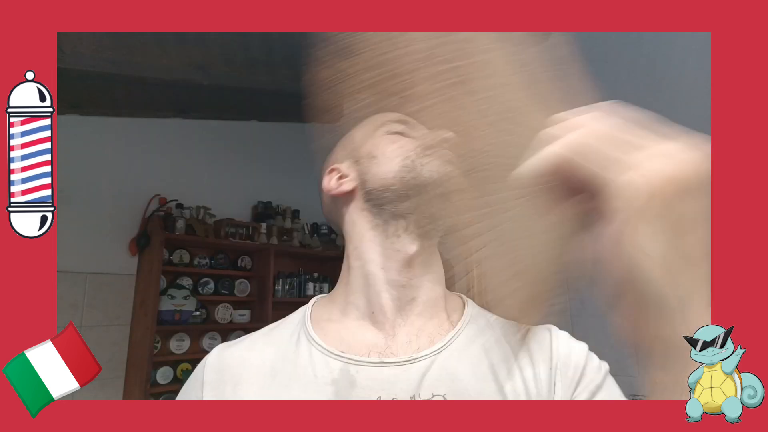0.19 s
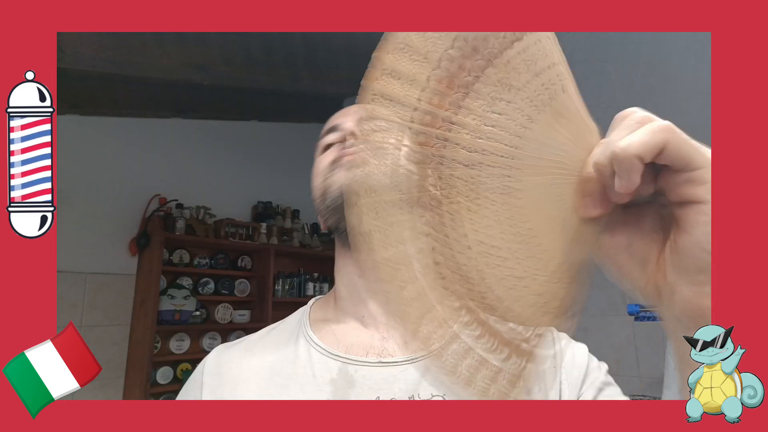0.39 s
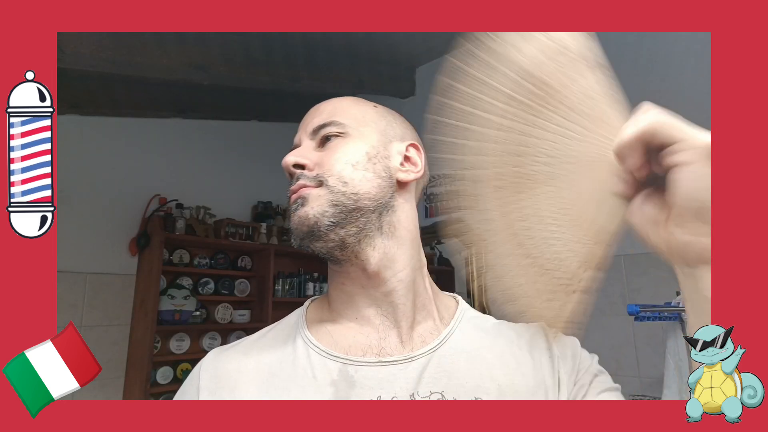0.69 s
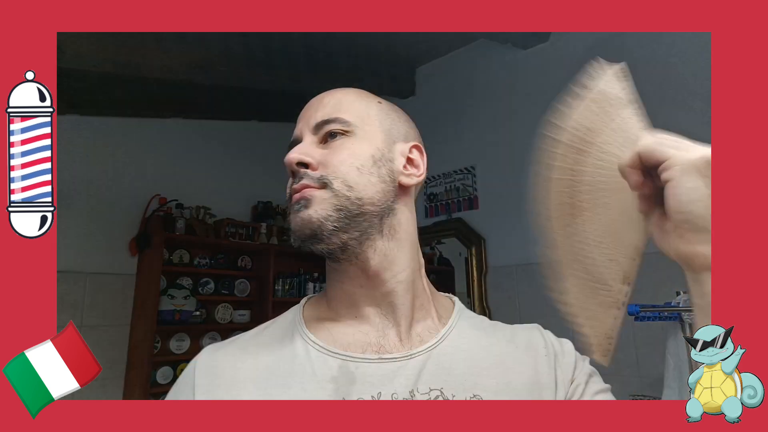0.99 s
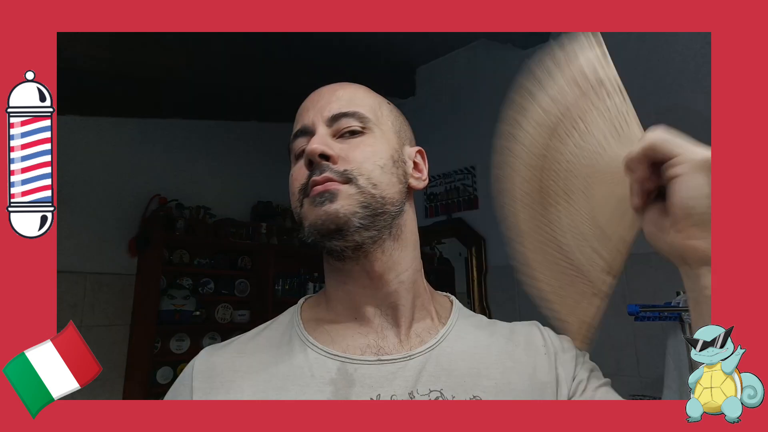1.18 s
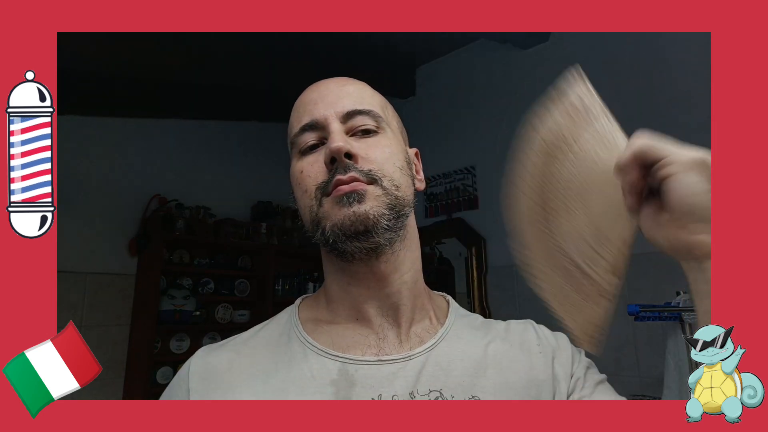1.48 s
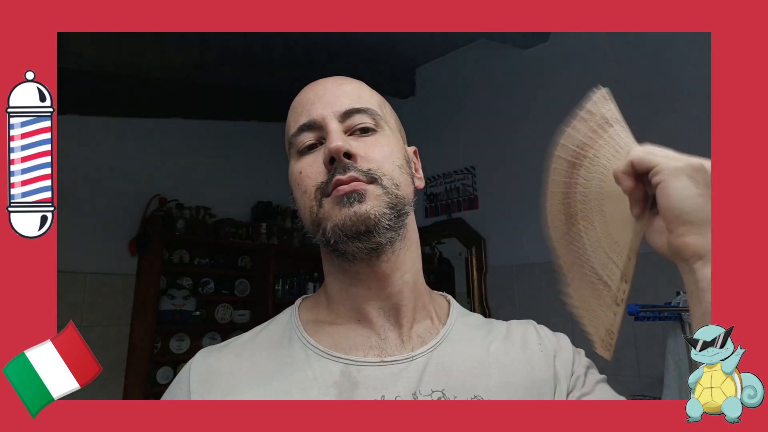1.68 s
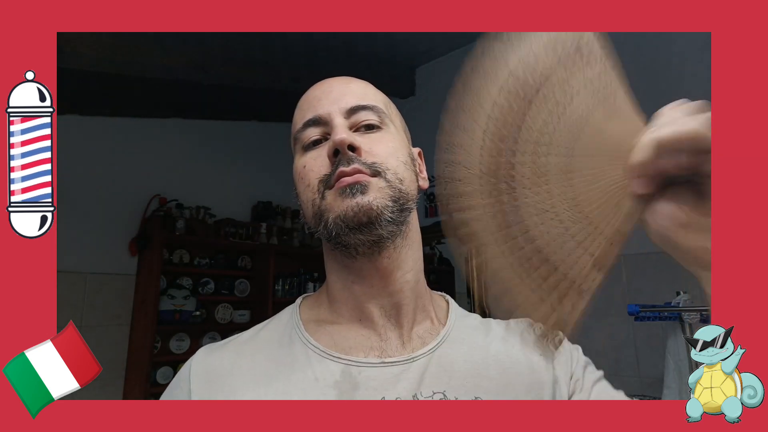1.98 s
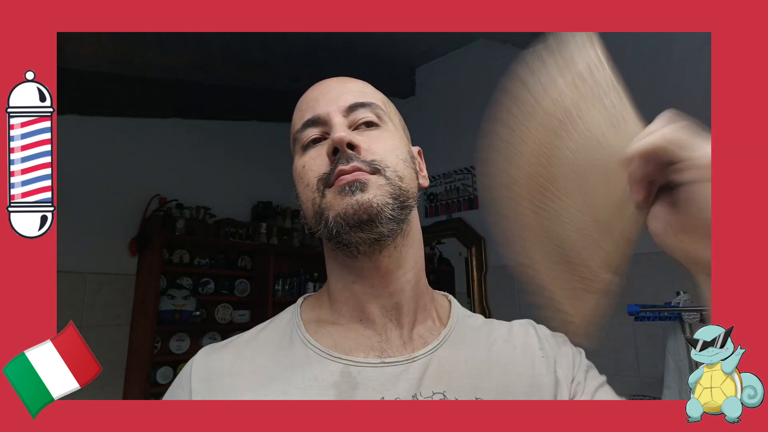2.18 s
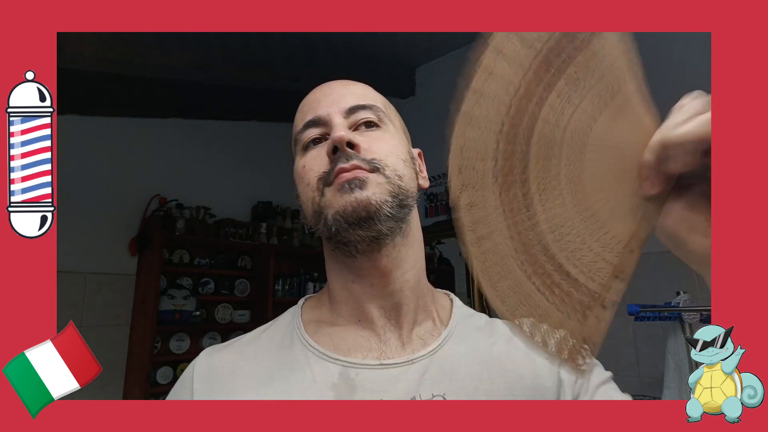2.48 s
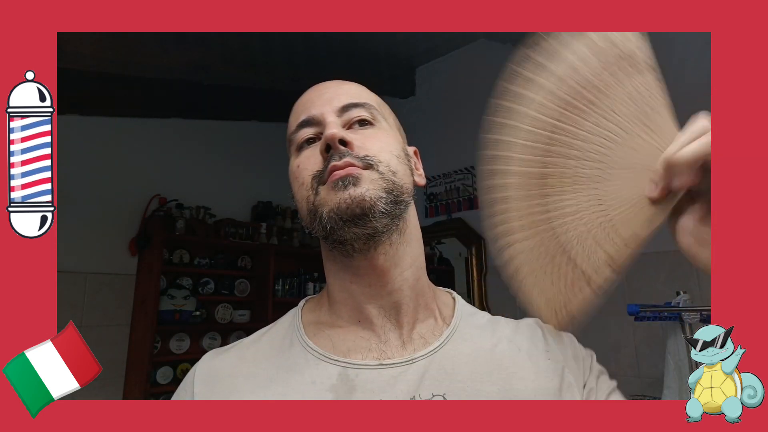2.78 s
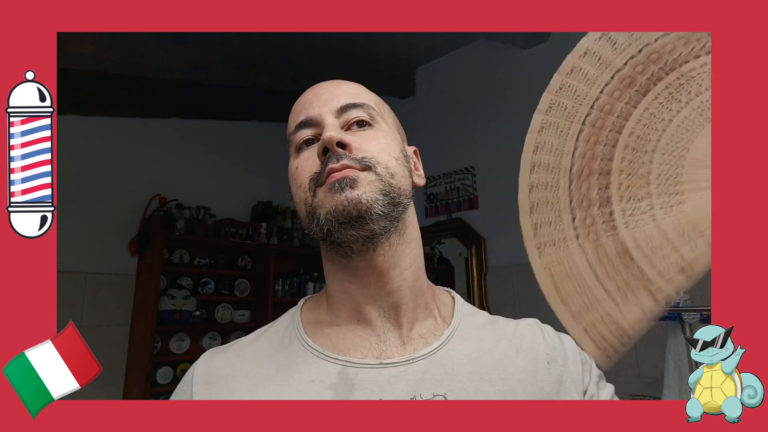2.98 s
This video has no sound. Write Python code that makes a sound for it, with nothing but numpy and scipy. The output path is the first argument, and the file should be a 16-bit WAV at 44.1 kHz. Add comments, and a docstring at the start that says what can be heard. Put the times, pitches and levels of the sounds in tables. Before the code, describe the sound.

Close stereo sound of a wooden hand fan beating quickly indoors; each stroke snaps the slats together with a short rattle and gentle puff of air, the return knocks softer, ending in faint rustle and quiet room tone.

```python
"""A slatted wooden hand fan is waved fast in a small room, heard close up in stereo.
It opens in the tail of a clap; then each forward stroke ends with the slats clapping together three times
and rattling out, and the air pushed by the leaf swells in a low whoosh. On each way back the slats slide
and knock more softly. After the last stroke a few loose slats tick and the leaf rustles to rest.
Wood is a train of random contacts through slat rings; air is noise in low resonances; quiet room tone lasts."""
import sys
import numpy as np
from scipy import signal
from scipy.fft import rfft, irfft
from scipy.io import wavfile
from scipy.ndimage import uniform_filter1d

SR = 44100
rng = np.random.default_rng(int(sys.argv[2]) if len(sys.argv) > 2 else 0)


def dump(signal):
    """Clip the signal to [-1, 1] and save it as 16-bit WAV at the path in sys.argv[1]."""
    limited = np.clip(np.atleast_2d(signal).T, -1, 1)
    pcm = np.round(limited * 32767).astype(np.int16)
    wavfile.write(sys.argv[1], SR, pcm)


N = 136710  # length [samples]
PARTS, SLATS = 6, 24  # parts of the leaf, and slats shared out among them

# Forward strokes of the fan: (time [s], first clap level [dB], second clap over the first [dB],
# delay of the second [s], rattle over the first clap [dB], whoosh level [dB], drive of the outer sticks' ring [dB],
# delay of the third clap [s], third clap over the first [dB], pitch of the loudest slat [Hz])
STROKES = [(-.02, -18, -2, 0.0046, -14, -70.5, 17, 0.017, -7, 3070),
           (0.2154, -22, 5, 0.0047, -5.5, -61.5, 9.5, 0.012, -4, 5450),
           (0.473, -22, 4, 0.004, -6.5, -55, 16.5, 0.0061, -4, 4800),
           (0.7072, -19.5, 6.5, 0.0046, -12.5, -60, 14.5, 0.012, 1.5, 3950),
           (0.9306, -17, 3, 0.0051, -11.5, -52.5, 14.5, 0.011, -9, 4740),
           (1.1606, -16.5, 3.5, 0.0043, -10, -52, 11.5, 0.008, -16, 4770),
           (1.39, -23.5, 11, 0.0045, -5.5, -52, 7.5, 0.032, -9, 4050),
           (1.6135, -21.5, 7.5, 0.0047, -8, -51, 6.5, 0.01, -1.5, 3710),
           (1.84, -22, -3, 0.0038, -5, -57, 7.5, 0.017, -4, 4900),
           (2.0628, -23, 7, 0.0042, -6, -57.5, 9, 0.018, -5, 4800),
           (2.2874, -21, 6.5, 0.0045, -7, -53.5, 9.5, 0.0088, 0, 4950),
           (2.5135, -23, 5.5, 0.0051, -5, -52, 9.5, 0.014, -2, 4860),
           (2.749, -20.5, -2.5, 0.0033, -12.5, -56.5, 12, 0.011, -2, 4800)]


def amp(db):
    """Decibels to amplitude."""
    return 10 ** (np.asarray(db) / 20)


def evened(x):
    """Scale to an RMS of one."""
    return x / np.sqrt(np.mean(x ** 2) + 1e-20)


def read(points, hz):
    """Read a curve of (frequency, value) points along a log frequency axis."""
    f, value = np.transpose(points)
    return np.interp(np.log(hz + 1), np.log(f + 1), value)


def dying(s, decay_s, rise_s):
    """Envelope: exponential rise up to time s, exponential fall after, both as time constants."""
    t = np.arange(N) / SR - s
    return np.exp(np.where(t < 0, t / rise_s, -t / decay_s))


def resonate(x, hz, width):
    """Two-pole resonance with its bandwidth in Hz."""
    return signal.lfilter(*signal.iirpeak(hz, hz / width, SR), x)


def contacts():
    """Tiny wood contacts at random moments, of random strength and sign."""
    per_s, spread_db = 12000, 2.5
    strength = amp(spread_db * np.minimum(rng.exponential(1, N), 4))
    struck = rng.random(N) < per_s / SR
    return evened(strength * struck * rng.choice([-1., 1.], N))


def claps(size):
    """Slats meet three times and rattle out; the outer sticks and one loud slat ring along."""
    hold_s, soft_rise_s = 0.0018, 0.00022
    first_s, later_s, rattle_s = 0.0011, 0.0021, 0.025  # decay time constants
    creak_db, creak_rise_s = -28.5, 0.0069  # faint creak that leads into a clap
    stick_hz, stick_width = 1385, 110
    loudest_db, loudest_width = 19, 207  # drive of the loudest slat's ring, width [Hz]
    force, loose, ring = np.zeros((3, N))
    for s, db, second_db, delay, rattle_db, _, stick_db, third, third_db, loudest_hz in STROKES:
        # the first clap rises quickly, holds for a moment, then dies
        clap = amp(db) * np.minimum(dying(s + hold_s, first_s, 1), dying(s, 1, soft_rise_s))
        clap += amp(db + second_db) * dying(s + delay, later_s, 0.00021)
        clap += amp(db + third_db) * dying(s + third, later_s, soft_rise_s)
        rattle = amp(db + rattle_db) * dying(s + delay, rattle_s, 0.0022)
        force += clap
        loose += rattle + amp(db + creak_db) * dying(s, 0.002, creak_rise_s)
        ring += amp(stick_db) * resonate(size * (clap + rattle), stick_hz, stick_width)
        ring += amp(loudest_db) * resonate(size * clap, loudest_hz, loudest_width)
    return force, loose, ring


def returns():
    """On the way back the slats slide with a slow swell and knock softly."""
    # Return strokes: (time [s], knock level [dB], slide over the knock [dB], rise time constant of the slide [s])
    backstrokes = [(0.099, -39.5, -2, 0.0014), (0.3359, -34.5, -8, 0.055), (0.579, -29, -6.5, 0.038),
                   (0.8034, -44, 7.5, 0.022), (1.037, -25.5, -12.5, 0.033), (1.2611, -28.5, -5, 0.028),
                   (1.4907, -34, -3.5, 0.026), (1.716, -25.5, -9.5, 0.029), (1.945, -30, -6, 0.03),
                   (2.1691, -27.5, -11, 0.018), (2.393, -28.5, -7.5, 0.022), (2.618, -27, -9.5, 0.029),
                   (2.82, -26.5, -13.5, 0.023)]
    knock_s, slide_s, soft_rise_s = 0.00092, 0.021, 0.00022  # time constants
    knocks, slides = np.zeros((2, N))
    for s, db, slide_db, swell in backstrokes:
        knocks += amp(db) * dying(s, knock_s, soft_rise_s)
        slides += amp(db + slide_db) * dying(s, slide_s, swell)
    return knocks, slides


def ticks():
    """Single loose slats tick: short bursts of contact strength."""
    # Loose slats: (time [s], level [dB])
    loose_slats = [(0.052, -44), (0.111, -41), (0.288, -35), (1.467, -34), (2.1623, -33), (2.832, -32.5),
                   (2.895, -42.5), (2.961, -40), (3.0157, -46), (3.091, -53)]
    return sum(amp(db) * dying(s, 0.0027, 0.00022) for s, db in loose_slats)


def settling():
    """The leaf rustles faintly as it comes to rest: one slow swell and fade."""
    return amp(-59) * dying(2.925, 0.28, 0.21)


def slat_sound():
    """One contact: a broad snap and an equally strong short ring of one slat, tuned its own way."""
    # Modes of a slat: (frequency before detuning [Hz], width before widening [Hz], level before spread [dB])
    modes = [(2364.6, 39, -6), (2860, 49, -4), (3890, 97, 1.5), (4910, 99, 3), (6178, 114, 4.5),
             (7760, 400, 3.5), (12500, 250, -24)]
    # Spectrum of the snap: (frequency [Hz], relative level [dB])
    snap_curve = [(300, -52), (760, -14.5), (1250, -7), (1850, -7.5), (2320, -2), (4100, -5.5), (10700, 1),
                  (15500, -7.5)]
    detune, widen, spread_db = .08, 1.5, 6.
    hz = np.fft.fftfreq(2048, 1 / SR)
    log_gain = np.log(amp(read(snap_curve, abs(hz))))
    # minimum phase puts the snap's energy at its start
    snap = np.fft.ifft(np.exp(np.conj(signal.hilbert(log_gain)))).real[:1024]
    t = np.arange(1024) / SR
    shift, level, phase = rng.standard_normal((3, len(modes)))
    ring = np.zeros(1024)
    for (f, width, db), d, l, p in zip(modes, shift, level, 2 * phase):
        fade = np.exp(-np.pi * width * widen * t)
        ring += amp(db + spread_db * l) * fade * np.sin(2 * np.pi * f * (1 + detune * d) * t + p)
    return evened(snap) + evened(ring)


def clumping():
    """Each part of the leaf rattles in its own uneven clumps, some of them common to all."""
    clump_db, clump_s, shared = 3.5, 0.0064, 0.28
    window = np.hanning(round(2 * clump_s * SR))
    clumps = evened(signal.oaconvolve(rng.standard_normal((PARTS, N)), window[None], "same"))
    return amp(clump_db * (clumps + shared * clumps[0]))


def leaning():
    """The part of the leaf that strikes hardest drifts, while the overall power stays level."""
    lean_db, lean_s = 4.0, .03
    drift = uniform_filter1d(rng.standard_normal((PARTS, N)), round(lean_s * SR), axis=1)
    lean = amp(lean_db * evened(drift))
    return lean / np.sqrt(np.mean(lean ** 2, axis=0))


def place(x, lag, pan_db):
    """Left and right copies of a sound on the fan: the far side is late and weaker, plus the slat's own offset."""
    # Path of the fan: (time [s], place [-1 left to 1 right])
    path = [(0, -0.79), (.5, 0.54), (.9, 0.81), (3.1, 1)]
    side_lag, side_db = 7.6, 2  # at full right: delay of the left [samples], right over left [dB]
    n = np.arange(N)
    side = np.interp(n / SR, *np.transpose(path))
    late = np.round(side_lag * side + lag).astype(int)
    db = side_db * side + pan_db
    left = amp(-db / 2) * x[np.clip(n - late, 0, N - 1)]
    return np.array([left, amp(db / 2) * x])


def slats():
    """Claps, slides and knocks drive wood contacts, each ringing a random slat in its place along the leaf."""
    lag_spread, pan_spread_db, slats_db = 3, 4, -9.5  # [samples], [dB], [dB]
    size = contacts()
    force, loose, ring = claps(size)
    knocks, slides = returns()
    force += knocks + ticks()
    loose += slides + settling()
    clumps = clumping()
    which = rng.integers(0, SLATS, size=N)
    spots = rng.standard_normal((SLATS, 2))
    train = size * leaning() * (force + loose * clumps)
    wood, parts = np.zeros((2, N)), np.zeros((PARTS, N))
    for k, (lag, pan) in enumerate(spots - spots.mean(0)):
        struck = train[k % PARTS] * (which == k)
        sound = signal.oaconvolve(struck, slat_sound())[:N] / np.sqrt(1024)
        wood += place(sound, lag_spread * lag, pan_spread_db * pan)
        parts[k % PARTS] += sound
    parts[0] += .5 * ring  # the ring reaches the room at half strength
    return amp(slats_db) * (wood + place(ring, 0, 0)), amp(slats_db) * parts


def gust(levels_db, hz, width, peak_s, shape):
    """Noise in a low resonance, swelling and fading after each clap."""
    level = np.zeros(N)
    for stroke, db in zip(STROKES, levels_db):
        u = np.maximum(np.arange(N) / SR - stroke[0], 0) / peak_s
        level += amp(db) * (u * np.exp(1 - u)) ** shape
    noise = resonate(rng.standard_normal(N), hz, width)
    return level * evened(resonate(noise, hz, 2 * width))


def whoosh():
    """Air off the leaf: a resonant gust with a fainter one an octave up, stronger on the right."""
    hz, width, peak_s, shape = 306.8, 36, 0.041, 1.85
    octave_db, right_db = -18, 5.5
    levels_db = np.transpose(STROKES)[5]
    air = gust(levels_db, hz, width, peak_s, shape)
    air += amp(octave_db) * gust(levels_db, 2 * hz, width, peak_s, shape)
    return air * amp([[-right_db / 2], [right_db / 2]])


def push():
    """Deep push of air after each clap, with a weak share of opposite sign left and right."""
    # Strength of the push: (time [s], level [dB])
    strength = [(0, -57.5), (1.4, -54.5), (2.6, -62)]
    hz, width, peak_s, shape, apart_db = 87, 50, 0.05, 10.2, -15.5
    levels_db = np.interp(np.transpose(STROKES)[0], *np.transpose(strength))
    both = gust(levels_db, hz, width, peak_s, shape)
    apart = gust(levels_db, hz, width, peak_s, shape)
    return both + amp(apart_db) * apart * [[1], [-1]]


def room_tail():
    """Sparse taps of random sign, each band dying at its own speed, the bass alike on both sides."""
    # Decay of the room: (frequency [Hz], time to fall 60 dB [s])
    decay = [(500, 0.68), (2000, 0.15), (9000, 0.13)]
    mono_hz, start_s = 770, .002
    taps, grid = np.zeros((2, SR // 2)), np.arange(0, SR // 2 - 20, 10)
    spots = grid + rng.integers(0, 10, (2, len(grid)))
    np.put_along_axis(taps, spots, rng.choice([-1., 1.], (2, len(grid))), 1)
    hz, t, z = signal.stft(taps, SR, nperseg=256)
    same = 1 / (1 + (hz[:, None] / mono_hz) ** 2)
    z[1] = same * z[0] + np.sqrt(1 - same ** 2) * z[1]
    fade = amp(-60 * t / read(decay, hz)[:, None])
    tail = signal.istft(z * fade, SR, nperseg=256)[1]
    return np.pad(tail / np.linalg.norm(tail[0]), ((0, 0), (round(start_s * SR), 0)))


def room(parts):
    """Each part of the leaf has its own echoes."""
    echoes = sum(signal.fftconvolve(x[None], room_tail(), axes=1)[:, :N] for x in parts)
    return amp(-3) * echoes


def room_tone():
    """Steady quiet noise, more alike in both channels in the bass than above."""
    # Spectrum of the tone: (frequency [Hz], relative level before the bass cut [dB])
    spectrum = [(29, -38), (50, 5), (288, 2), (404, -7.5), (1590, -6.5), (3420, -8), (5520, -62),
                (15500, -79)]
    # Stereo likeness: (frequency [Hz], left-right correlation [0 to 1])
    likeness = [(60, 1), (950, 0.17), (15000, 0.17)]
    tone_db, cut_hz = -66.5, 45
    hz = np.fft.rfftfreq(N, 1 / SR)
    a, b = rfft(rng.standard_normal((2, N)), axis=1)
    same = read(likeness, hz)
    z = np.array([a, same * a + np.sqrt(1 - same ** 2) * b])
    z *= amp(read(spectrum, hz)) * hz ** 2 / (hz ** 2 + cut_hz ** 2)
    return amp(tone_db) * evened(irfft(z, N, axis=1))


def scene():
    """Wooden slats, their echoes, the moving air and the room tone."""
    wood, parts = slats()
    return wood + room(parts) + whoosh() + push() + room_tone()


def record(dry):
    """The top of the treble is dulled, then cut."""
    dull_hz, dull_db, edge_hz = 15750, -18, 16800
    hz = [0, dull_hz, dull_hz + 150, SR / 2]
    shelf = signal.firwin2(511, hz, [1, 1, amp(dull_db), amp(dull_db)], fs=SR)
    edge = signal.firwin(511, edge_hz, window=("kaiser", 9), fs=SR)
    return signal.oaconvolve(dry, np.convolve(shelf, edge)[None], "same")


dry = scene()
out = record(dry)
dump(out)
```